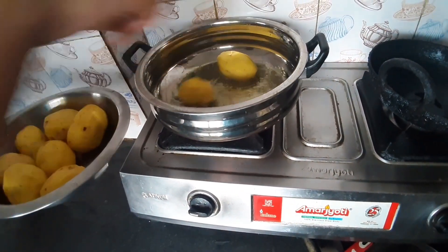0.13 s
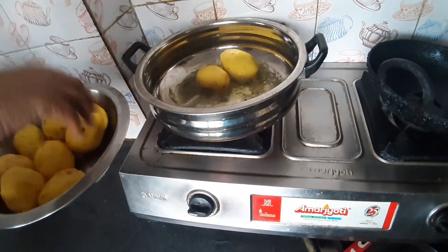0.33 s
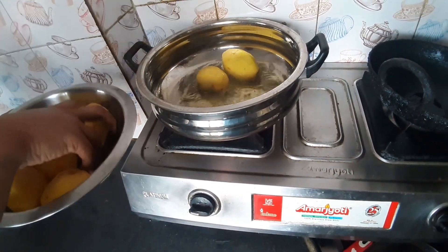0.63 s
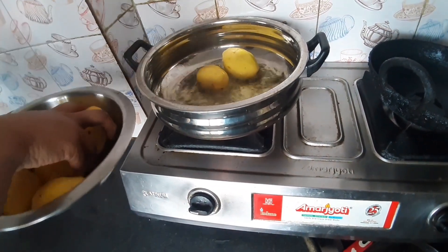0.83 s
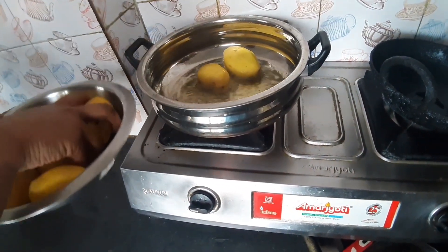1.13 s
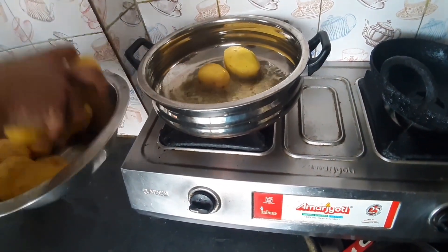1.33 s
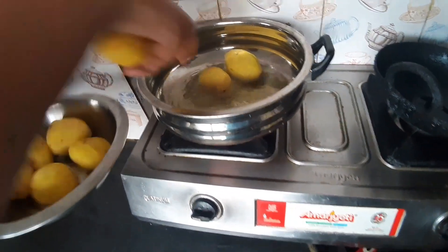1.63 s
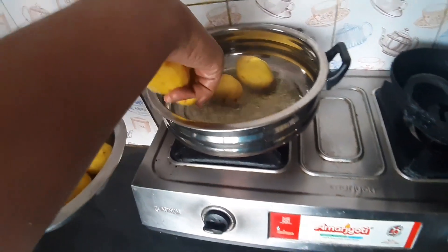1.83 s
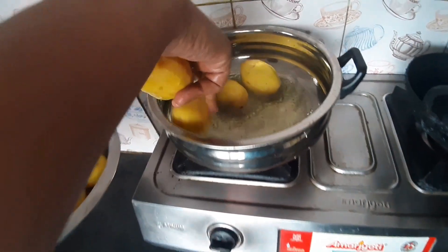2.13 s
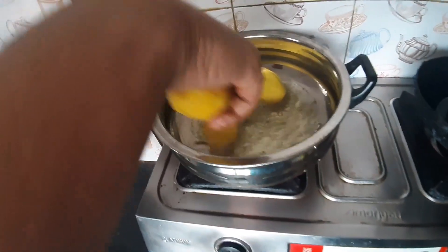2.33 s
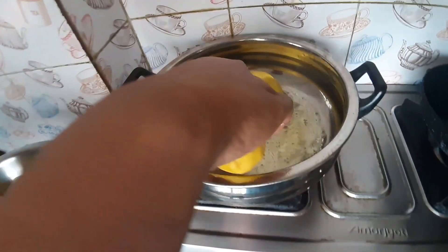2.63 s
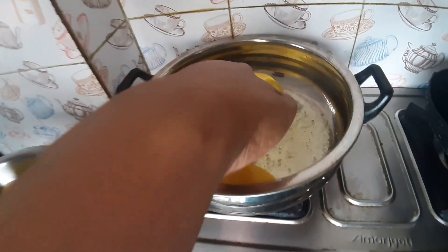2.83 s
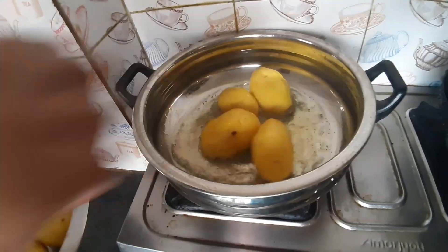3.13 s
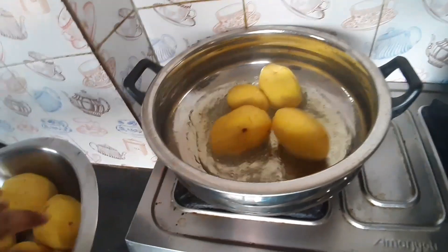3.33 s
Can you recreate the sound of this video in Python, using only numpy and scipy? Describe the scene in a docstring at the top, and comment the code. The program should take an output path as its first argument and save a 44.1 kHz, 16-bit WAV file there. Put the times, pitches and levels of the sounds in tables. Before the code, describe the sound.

Frying potatoes in hot oil: a faint simmer and low stove murmur open, then sizzling swells within 0.2 s with low gulps and a spit. It crackles unevenly, thins around 1.3 s amid hollow bubble pops, surges at 1.5 s, ebbs near 2.1 s, then surges at 2.2 and 2.9 s, staying strong to the end. Bright, close stereo, slight metallic pan ring, short tiled-room echo.

```python
"""Potatoes lowered into hot oil in a steel pan on a stove, small tiled kitchen; stereo, 3.5 s.
A stove murmur and a simmer open; gulps of steam heave the oil and frying swells within 0.2 s, as ringing
bursts of five bubble sizes. From 0.08 s droplets spit as noise puffs; from 0.13 s large bubbles pop as rising
sines, and both echo. The sizzle thins by 1.3 s, surges at 1.5 s, ebbs near 2.1 s, then surges to the end.
Two ports of unlike colour hear it, alike in the bass and nearly unrelated in the treble."""
import sys
import numpy as np
from scipy import signal
from scipy.fft import rfft, irfft, next_fast_len
from scipy.io import wavfile

SR = 44100
rng = np.random.default_rng(int(sys.argv[2]) if len(sys.argv) > 2 else 0)


def master(y):
    """Save y as 16-bit WAV."""
    cut = np.clip(np.atleast_2d(y).T, -1, 1)
    pcm = np.round(cut * 32767)  # scale
    wavfile.write(sys.argv[1], SR, pcm.astype(np.int16))


def magnitude_from_level(level_db):
    """Linear magnitude for a level in decibels (20 dB per decade)."""
    exponent = np.asarray(level_db, float) / 20
    return 10 ** exponent


N = 154350

# likeness of the two ports: f/Hz, likeness/1
PORT_LIKENESS = [(130, .96), (300, .96), (640, .7), (1400, .35), (3500, .05)]
SIMMER_DB = (-56.5, -53.5)   # churning, gurgle
FLICKER_PER_S = 24
LEFT_RIGHT = np.array([[1], [-1]])


def rms_one(x):
    """Scales to rms 1."""
    return x / np.sqrt(np.mean(x ** 2) + 1e-20)


def at_hz(points, hz):
    """Reads a spectrum on a log-frequency axis."""
    points_hz, values = np.transpose(points)
    return np.interp(np.log(np.maximum(hz, 1)), np.log(points_hz), values)


def drift(rate_hz):
    """Slow chance of spread 1: twice low-passed noise, drawn every 20 samples."""
    r = np.exp(-40 * np.pi * rate_hz / SR)
    white = rng.standard_normal(N // 20 + 2002)
    slow = signal.lfilter([1], [1, -2 * r, r * r], white)[2000:]   # settled part
    return np.interp(np.arange(N) / 20, np.arange(len(slow)), rms_one(slow - slow.mean()))


def bandpass(x, order, low_hz, high_hz):
    """Butterworth band-pass."""
    return signal.sosfilt(signal.butter(order, [low_hz, high_hz], "band", fs=SR, output="sos"), x)


def heaving():
    """Levels/dB of the two large sizes: each gulp of steam rises fast, then fades back to the simmer."""
    # gulps that heave the oil: t/s, churning level/dB, gurgle level/dB, fade delay/s
    gulps = [(0.04, -44, -37, 0.041), (0.134, -42.5, -39.5, 0.035), (0.547, -47.5, -29.5, 0.0096),
             (0.652, -73, -35.5, 0.02), (1.433, -43, -34.5, 0.021), (1.688, -48.5, -36.5, 0.0073),
             (1.823, -51.5, -36, 0.0053), (2.217, -33, -30, 0.053), (2.41, -52.5, -46, 0.21),
             (2.665, -45.5, -44.5, 0.28), (2.859, -34.5, -30.5, 0.11), (3.071, -38, -32.5, 0.029),
             (3.186, -47.5, -48, 0.17)]
    attack_s, fade_db_per_s = 0.012, (82, 138)   # fades: churning, gurgle
    t = np.arange(N) / SR
    power = magnitude_from_level(np.array(SIMMER_DB))[:, None] ** 2
    for start_s, churn_db, gurgle_db, hold_s in gulps:
        fade_db = np.outer(fade_db_per_s, np.maximum(t - start_s - hold_s, 0))
        rise = np.clip((t - start_s) / attack_s, 0, 1)
        power = power + (magnitude_from_level(np.array([[churn_db], [gurgle_db]]) - fade_db) * rise) ** 2
    return 10 * np.log10(power)


def rumble():
    """Low murmur of flame and stove: band noise, a little stronger when the oil churns."""
    simmer_rumble_db, sway_db, follow = -59, 1.5, 0.37   # follow: dB per dB of churning
    mid, side = bandpass(rng.standard_normal((2, N)), 2, 62, 166)
    follow_db = follow * (heaving()[0] - SIMMER_DB[0])
    level_db = simmer_rumble_db + follow_db + sway_db * drift(6.3)
    return magnitude_from_level(level_db) * rms_one(mid + 0.25 * side * LEFT_RIGHT)


def ring(clicks, hz, t60_s):
    """Two-pole resonator: a unit click sets a decaying sine of height 1 ringing."""
    r, w = magnitude_from_level(-60 / (t60_s * SR)), 2 * np.pi * hz / SR
    return signal.lfilter([0, np.sin(w)], [1, -2 * r * np.cos(w), r * r], clicks + 1e-18)


def bubbles(low_hz, high_hz, rate_per_s, cycles, spread_db, flicker_db, count=10):
    """Random bursts, each ringing at one of many pitches; ports share each burst, with unlike phase."""
    # spectrum of the bursts: f/Hz, relative density/dB per Hz
    burst_colour = [(53, -44), (90, -15), (254, -23.5), (400, -10), (500, -18), (578, -18.5), (1000, -12.5),
                    (1940, 0), (3330, 3), (7570, 2.5), (9820, 5), (12500, 13.5), (15800, -14.5)]
    sizes = magnitude_from_level(spread_db * np.minimum(rng.exponential(1, N), 5))
    sizes = sizes * (rng.random(N) < rate_per_s / SR)
    clicks = sizes * rng.standard_normal((2, N))
    dealt = rng.integers(0, count, N)   # pitch index of each burst
    out = 0
    for k, hz in enumerate(np.geomspace(low_hz, high_hz, 2 * count + 1)[1::2]):
        mid, side = rms_one(ring(clicks * (dealt == k), hz, cycles / hz))
        alike = np.clip(at_hz(PORT_LIKENESS, hz), 0, 1)
        flicker = flicker_db * drift(FLICKER_PER_S / 2)
        gain = np.sqrt(hz) * magnitude_from_level(at_hz(burst_colour, hz) + flicker)   # sqrt: bands widen with pitch
        out = out + gain * (np.sqrt(1 + alike) * mid + np.sqrt(1 - alike) * side * LEFT_RIGHT)
    return rms_one(bandpass(out, 3, low_hz, high_hz))


def frying():
    """Five bubble sizes follow their levels; all but the largest seethe together and flare in crackles."""
    # small sizes: t/s, coarse bubbles level/dB, fizz level/dB, fine spray level/dB
    small_levels = [(0, -48.5, -40, -47), (.04, -38, -28.5, -31), (.16, -38, -23.5, -23),
                    (.2, -27.5, -19.5, -24.5), (.56, -27.5, -23.5, -31), (.7, -28.5, -24, -35.5),
                    (.81, -37, -30, -33.5), (.86, -29, -23, -31), (.92, -37, -27.5, -37.5),
                    (.96, -43, -37, -35), (1.06, -42.5, -28, -35), (1.12, -39, -25, -35),
                    (1.2, -35.5, -31, -37), (1.3, -52, -43.5, -41), (1.338, -38, -27, -38),
                    (1.43, -40, -31, -42), (1.49, -30.5, -20.5, -24), (1.58, -26, -21.5, -30),
                    (1.688, -31.5, -25, -37), (1.697, -31, -19.5, -29), (1.79, -31.5, -26.5, -35),
                    (1.89, -33, -24.5, -36), (1.96, -41, -26, -33.5), (2.01, -36.5, -31.5, -40),
                    (2.068, -45, -33, -36.5), (2.1, -35.5, -27.5, -36), (2.15, -50, -38.5, -42),
                    (2.2, -34, -24, -35), (2.23, -25.5, -22.5, -21), (2.309, -27.5, -20, -23.5),
                    (2.378, -37.5, -27.5, -29.5), (2.68, -34.5, -24, -29.5), (2.76, -35, -27, -35.5),
                    (2.85, -32.5, -25, -33), (2.882, -26, -19, -23), (2.98, -26, -21.5, -26.5),
                    (3.05, -32.5, -23, -27.5), (3.09, -28, -20, -22.5), (3.17, -24, -20.5, -30),
                    (3.33, -28, -24.5, -27.5), (3.5, -31.5, -28, -37)]
    # sizes, large to small: lowest f/Hz, highest f/Hz, bursts/(1/s), ring to -60 dB/cycles,
    # size spread/dB, flicker/dB
    bubble_sizes = [(93, 471, 2900, 9.4, 0.5, 4), (524.6, 1396, 4000, 19.7, 0.33, 2.5),
                    (1309, 3360, 8000, 30.4, -0.27, 2.5), (3214, 9125, 20000, 30, 0.5, 2.5),
                    (8900, 20000, 24000, 5.5, -0.7, 2)]
    gurgle_under_coarse_db, seethe_db = -15.5, 0.5
    crackles_per_s, crackle_fade_s, crackle_db = 35, 0.01, -11.5
    times_s, *small = np.transpose(small_levels)
    t = np.arange(N) / SR
    churn_db, gurgle_db = heaving()
    coarse_db, fizz_db, spray_db = [np.interp(t, times_s, db) for db in small]
    # the coarse bubbles lend the gurgle a floor
    gurgle_db = 10 * np.log10(magnitude_from_level(gurgle_db) ** 2 + magnitude_from_level(coarse_db + gurgle_under_coarse_db) ** 2)
    starts = np.minimum(rng.exponential(1, N), 3) * (rng.random(N) < crackles_per_s / SR)
    fade = np.exp(-1 / (crackle_fade_s * SR))
    flares = signal.lfilter([magnitude_from_level(crackle_db)], [1, -fade], starts)
    seethe = rms_one(magnitude_from_level(seethe_db * drift(FLICKER_PER_S)) * (1 + flares))
    out = 0
    for k, db in enumerate([churn_db, gurgle_db, coarse_db, fizz_db, spray_db]):
        out = out + magnitude_from_level(db) * bubbles(*bubble_sizes[k]) * (seethe if k else 1)
    return out


def spits():
    """A droplet flashes to steam: a broad crack and a short bright crackle around its pitch."""
    # droplets: t/s, relative level/dB, f/Hz
    droplets = [(0.078, -9, 8250), (0.7133, -16, 7300), (0.995, -17.5, 7560), (1.044, -14, 6000),
                (1.2865, -15, 7550), (1.498, -11, 7400), (1.6929, -9.5, 7300), (2.133, -13.5, 7100),
                (2.612, -6, 7160), (2.7073, -13.5, 4510), (2.995, -10, 5040), (3.079, -8, 5730)]
    width, gain_db, crack_db = 0.08, -4.5, -5.5   # width: fraction of pitch, each way
    t60_s, attack_s = 0.026, 0.002
    out, t = np.zeros((2, N + SR)), np.arange(SR // 10) / SR
    for start_s, db, hz in droplets:
        white = rng.standard_normal((2, 2, len(t)))
        crackle = rms_one(bandpass(white[0], 1, hz / (1 + width), hz * (1 + width)))
        crack = magnitude_from_level(crack_db) * np.diff(white[1], prepend=0) / 2
        envelope = magnitude_from_level(db + gain_db - 60 * t / t60_s) * np.minimum(t / attack_s, 1)
        i = int(start_s * SR)
        out[:, i:i + len(t)] += envelope * (crackle + crack)
    return out[:, :N]


def pops():
    """A big bubble opens with a dull tick, rings with rising pitch and breaks into weaker ones just after."""
    # large bubbles: t/s, relative level/dB, f/Hz
    large_bubbles = [(0.135, -29, 243), (0.473, -11.5, 1883), (0.5184, -14, 1955), (0.577, -16, 1556),
                     (0.6133, -14, 2015), (0.7176, -15.5, 1947), (0.851, -28, 1550), (1.161, -12.5, 2720),
                     (1.3248, -21, 1800), (1.3304, -9, 1513), (1.334, -11.5, 1965), (1.354, -14, 1634),
                     (1.4454, -19, 1914), (1.6937, -20, 1800), (1.697, -28, 683), (1.7364, -15, 1820),
                     (1.77, -21, 1760), (1.802, -14, 2600), (1.8287, -15, 2680), (1.861, -19, 2890),
                     (1.8923, -11, 2360), (1.9928, -23.5, 1900), (2.0866, -9, 1846), (2.1598, -10.5, 1850),
                     (2.6698, -15.5, 1880), (2.7023, -17, 1850), (2.8409, -16, 1960), (2.874, -18.5, 646),
                     (2.88, -28, 259), (2.911, -29, 235), (2.947, -27, 233), (2.964, -22, 576),
                     (3.0168, -15.5, 2790), (3.0954, -13, 2525), (3.185, -23, 2020), (3.2575, -20, 2080),
                     (3.3237, -13, 2244)]
    tick_db, ring_db, breakup_db = -6, -2.0, 2   # breakup: loss per further ring
    ref_hz, ref_t60_s, ref_attack_s, ref_gap_s = 1800, 0.022, 0.0018, 0.0036   # times at ref_hz
    rise, scatter, gap_scatter = 0.074, 0.09, 0.307   # rise: fraction of pitch per t60
    out, t = np.zeros((2, N + SR)), np.arange(SR // 4) / SR
    chance = rng.standard_normal((len(large_bubbles), 32))
    for (start_s, db, hz), c in zip(large_bubbles, chance):
        slower = np.sqrt(ref_hz / hz)   # deeper bubbles are slower
        unlike = 1 - at_hz(PORT_LIKENESS, hz)
        white = np.array([[1, unlike], [1, -unlike]]) @ rng.standard_normal((2, len(t)))
        tick = bandpass(white, 2, hz / 3, 2 * hz)
        i = int(start_s * SR)
        out[:, i:i + len(t)] += magnitude_from_level(db + tick_db - 60 * t / 0.015) * tick
        t60_s = ref_t60_s * slower
        attack = np.minimum(t / (ref_attack_s * slower), 1)
        for k in range(8):
            later = k > 0   # the first ring keeps pitch and time
            f = hz * (1 + scatter * c[k] * later)
            phase = 2 * np.pi * f * (t + rise * t * t / (2 * t60_s))
            phase = phase + c[k + 8] + unlike * c[k + 16] * LEFT_RIGHT
            delay_s = (k + gap_scatter * c[k + 24] * later) * ref_gap_s * slower
            i = int((start_s + delay_s) * SR)
            envelope = magnitude_from_level(db + ring_db - breakup_db * k - 60 * t / t60_s) * attack
            out[:, i:i + len(t)] += envelope * np.sin(phase)
    return out[:, :N]


def kitchen(x):
    """Tiled-room echo: six feedback delays a side, duller on every round, stepped block by block."""
    t60_s, wall_cut_hz = 0.33, 7400
    out, dull = np.zeros((2, N)), np.exp(-2 * np.pi * wall_cut_hz / SR)
    for k, lag in enumerate((rng.uniform(0.0068, 0.03, 12) * SR).astype(int)):
        loop, gain, state = x.copy(), magnitude_from_level(-60 * lag / SR / t60_s), [0.]
        for i in range(lag, N, lag):
            back, state = signal.lfilter([gain * (1 - dull)], [1, -dull], loop[i - lag:i], zi=state)
            loop[i:i + lag] += back[:N - i]
        out[k % 2] += (loop - x) * (-1) ** (k // 2)
    return out


def through_pan(x):
    """The pan rings along with the bursts: parallel two-pole resonances join the direct sound."""
    # steel pan and its hollow: f/Hz, width/Hz, level over direct/dB
    pan_modes = [(257, 35, 6), (578, 45, 4), (672, 25, 2), (1572, 60, 0), (1820, 35, 1), (2600, 90, -1),
                 (4450, 150, -2), (7431, 80, -2)]
    out = x
    for hz, width_hz, db in pan_modes:
        r, w = np.exp(-np.pi * width_hz / SR), 2 * np.pi * hz / SR
        edge = (1 - r * r) / 2
        out = out + magnitude_from_level(db) * signal.lfilter([edge, 0, -edge], [1, -2 * r * np.cos(w), r * r], x)
    return out


def scene():
    """Frying and single bursts with their echo ring the pan; rumble lies beneath."""
    echo_db, left_minus_right_db = -16, -3.5
    single = pops() + spits()
    single = single + magnitude_from_level(echo_db) * kitchen(single[0])
    single = single * magnitude_from_level(left_minus_right_db / 2 * LEFT_RIGHT)
    return magnitude_from_level(1.5) * through_pan(frying() + single) + rumble()


def low_pass(x):
    """Removes everything above the highest recorded frequency."""
    return signal.sosfilt(signal.butter(12, 16020, fs=SR, output="sos"), x)


def record(dry):
    """Each port has its own colour; the top is cut at 16030 Hz."""
    # port colours: f/Hz, left minus right/dB
    port_tilt = [(200, 0.5), (1300, -1), (2000, -8.5), (3300, -2), (5500, -1.5), (7800, -8), (9000, 2.5),
                 (12000, 2)]
    size = next_fast_len(N + 4096)
    hz = np.fft.rfftfreq(size, 1 / SR)
    tilt_db = at_hz(port_tilt, hz) / 2 * LEFT_RIGHT
    mix = irfft(rfft(dry, size) * magnitude_from_level(tilt_db) * (hz < 16030), size)[:, :N]
    return low_pass(mix)


dry = scene()
out = record(dry)
master(out)
```